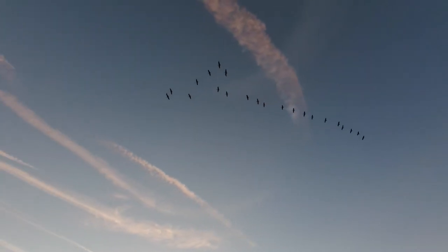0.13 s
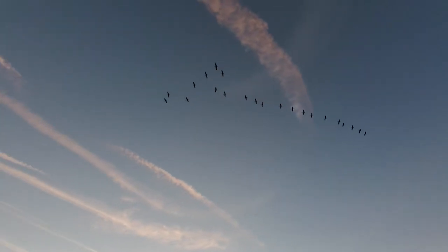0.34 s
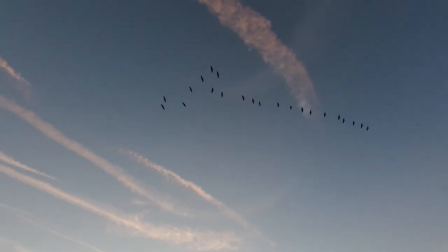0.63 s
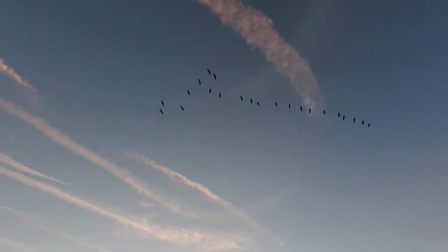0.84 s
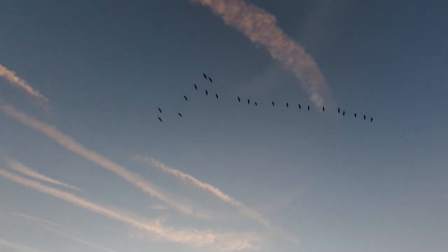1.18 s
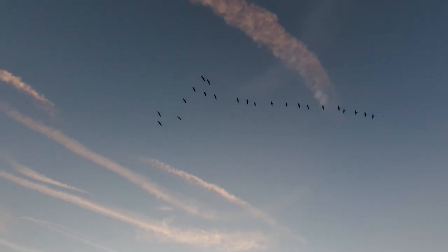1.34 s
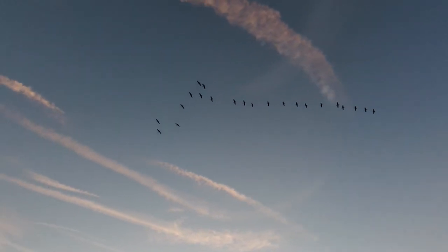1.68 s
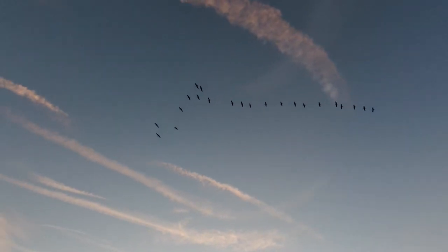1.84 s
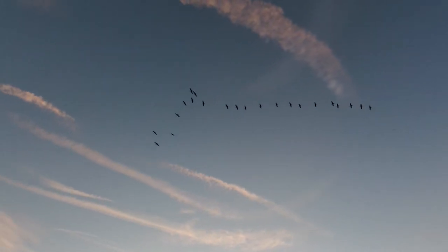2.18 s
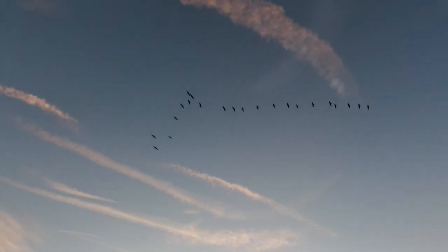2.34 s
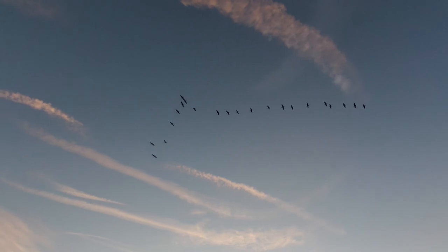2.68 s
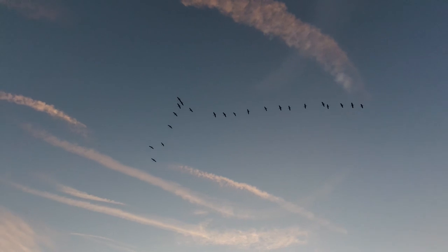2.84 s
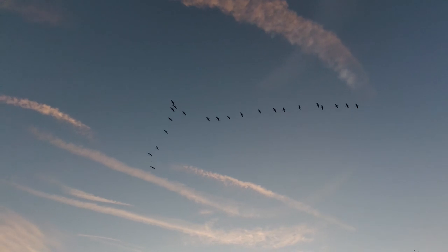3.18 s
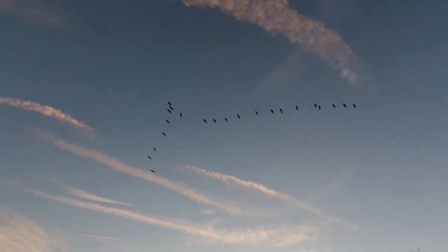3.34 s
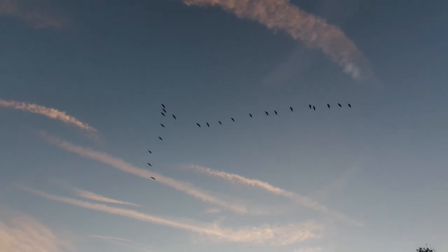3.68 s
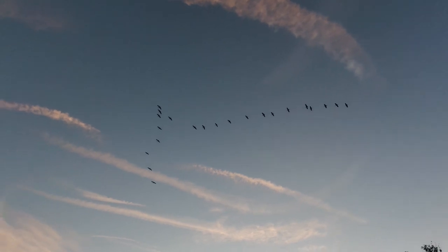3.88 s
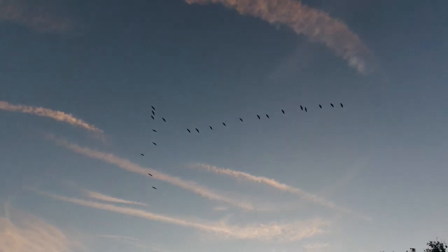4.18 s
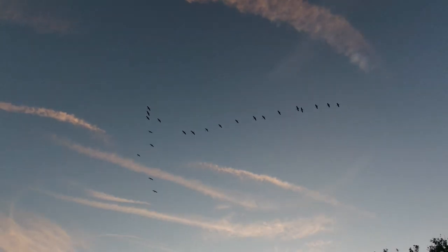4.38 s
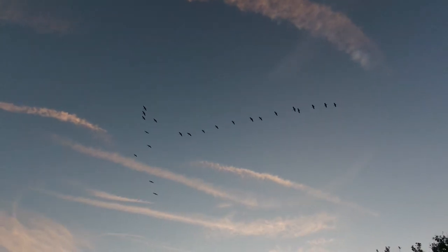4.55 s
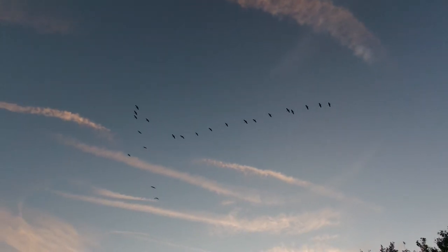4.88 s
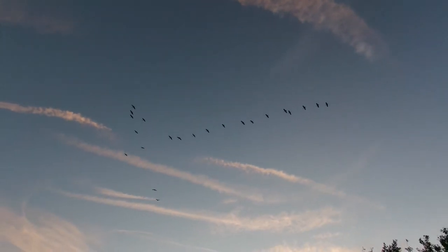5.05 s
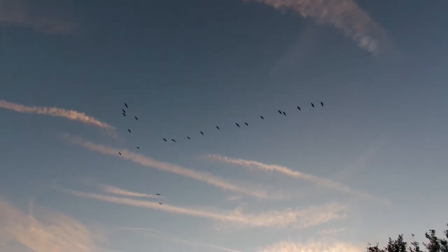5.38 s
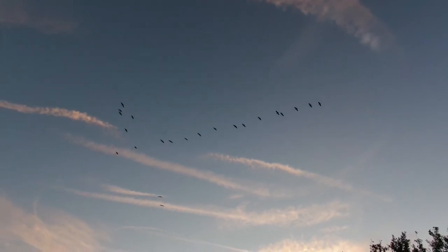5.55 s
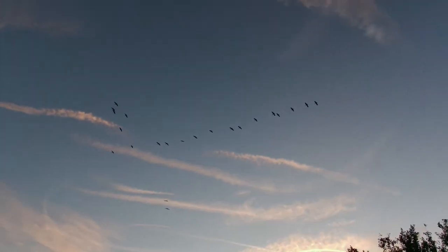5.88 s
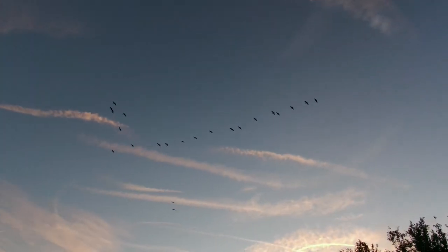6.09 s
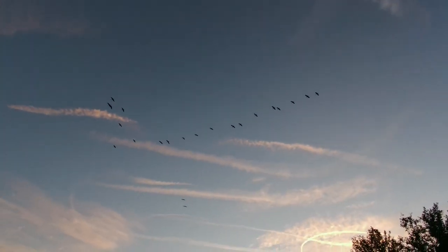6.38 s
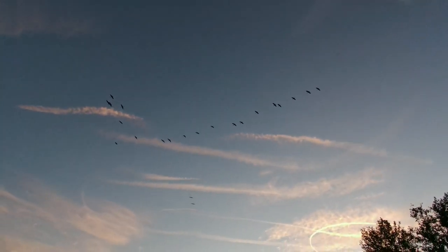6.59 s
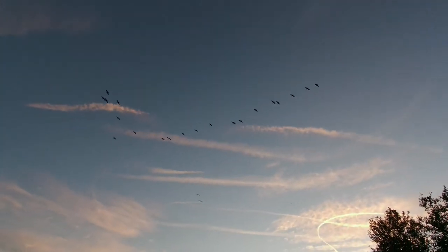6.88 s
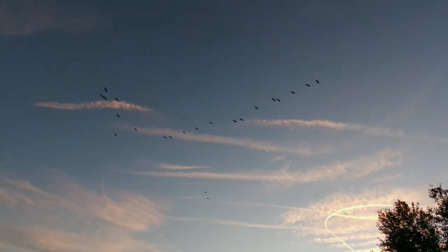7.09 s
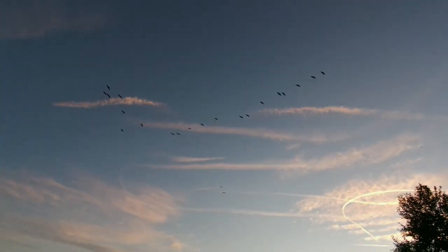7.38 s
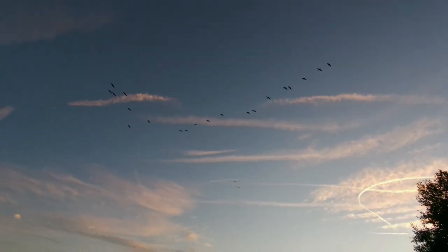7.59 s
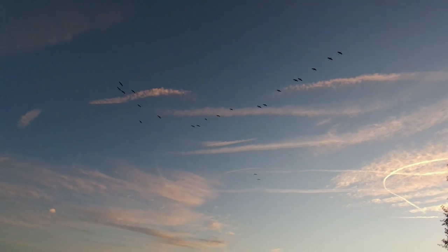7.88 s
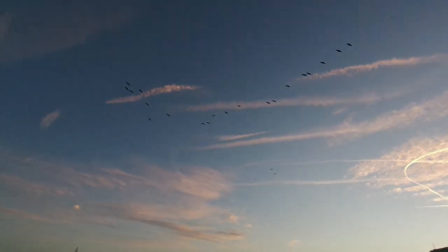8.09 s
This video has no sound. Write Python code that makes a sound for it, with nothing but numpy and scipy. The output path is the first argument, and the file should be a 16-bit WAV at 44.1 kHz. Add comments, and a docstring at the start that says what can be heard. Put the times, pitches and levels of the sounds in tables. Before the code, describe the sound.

A flock of cranes passes overhead, honking and rolling in overlapping bugles above a distant chorus, with faint camera motor whirs and soft air hiss.

```python
"""A flock of cranes calls: near birds honk and roll over a chorus of far ones, and young birds peep.
Calls are sums of a fundamental and its overtones; the overtones pass through a windpipe colour, then all birds echo.
A camera adds a gliding motor whine, low groans, patches of raspy treble and faint steady tones.
Coloured noise stands for far traffic, air and microphone hiss."""
import sys
import numpy as np
from scipy import signal
from scipy.fft import rfft, irfft
from scipy.io import wavfile
from scipy.ndimage import uniform_filter1d

SR = 44100
rng = np.random.default_rng(int(sys.argv[2]) if len(sys.argv) > 2 else 0)


def master(y):
    """Save y as 16-bit WAV."""
    cut = np.clip(np.atleast_2d(y).T, -1, 1)
    pcm = np.round(cut * 32767)  # scale
    wavfile.write(sys.argv[1], SR, pcm.astype(np.int16))


def volts_from_db(level):
    """Convert decibel levels to linear amplitude ratios."""
    exponent = np.asarray(level, float) / 20
    return 10 ** exponent


N = 362943
T = np.arange(N) / SR
HOARSE_ABOVE_HZ = 1050   # higher near voices are hoarse and arch less
HONK_TILT_DB, EDGE_TILT_DB = -2, -3.5   # dB per overtone: throughout; added at the ends, where effort is low
WHINE_TOP_HZ = 15800   # the whine is silent from here up


def coloured(x, points):
    """Filter by a (frequency [Hz], level [dB]) spectrum."""
    hz = np.maximum(np.fft.rfftfreq(N, 1 / SR), 1)
    point_hz, point_db = np.transpose(points)
    gain = volts_from_db(np.interp(np.log(hz), np.log(point_hz), point_db))
    return irfft(rfft(x) * gain, N)


def rms_one(x):
    """Scale to unit power."""
    return x / np.sqrt(np.mean(x ** 2) + 1e-20)


def drift(rate, count=N):
    """Smooth chance of spread about 1: random knots, rate of them per second, joined by straight lines."""
    knots = rng.standard_normal(int(count * 400 / SR) + 2)
    return 1.22 * np.interp(np.arange(count) * rate / SR, np.arange(len(knots)), knots)


def played(rows, fade_s):
    """Slice, columns over time and a faded window for one note."""
    s, *columns = np.transpose(rows)
    span = slice(int(s[0] * SR), min(int(s[-1] * SR), N))
    t = T[span]
    window = np.clip(np.minimum(t - s[0], s[-1] - t) / fade_s, 0, 1)
    return span, [np.interp(t, s, column) for column in columns], window


def voice(hz, tilt_db=0, count=7, flicker_db=0):
    """Fundamental (rms 1) and the sum of the overtones of a membrane swinging at hz; each overtone may flicker."""
    phase = 2 * np.pi * (np.cumsum(hz) / SR + rng.random())
    overtones = 0
    for k in range(2, count + 1):
        flicker = flicker_db * drift(22.8, count=len(hz)) if flicker_db else 0
        overtones = overtones + volts_from_db(tilt_db * (k - 2.5) + flicker) * np.cos(k * phase)
    return np.sqrt(2) * np.cos(phase), np.sqrt(2) * overtones


def glides(notes, waver):
    """Single gliding tones without overtones."""
    out = np.zeros(N)
    for rows in notes:
        span, (hz, level_db), window = played(rows, fade_s=0.0056)
        hz = hz * (1 + waver * drift(140.0, count=len(hz)))
        out[span] += window * volts_from_db(level_db) * voice(hz, count=1)[0]
    return out


def toot(start, length, hz, high_db, low_db):
    """Rows (s, Hz, fundamental dB, overtones dB, tilt dB) of a held note that sags ever faster."""
    sag_per_s2, edge_db = 3.51, 1.5   # share of pitch lost per s squared; level lost at the ends
    away = np.linspace(-1, 1, num=7)
    s = length * (away + 1) / 2
    level_db = high_db - edge_db * away ** 2
    pitch = hz * (1 - sag_per_s2 * s ** 2)
    tilt = HONK_TILT_DB + EDGE_TILT_DB * away ** 2
    return np.transpose([start + s, pitch, level_db + low_db, level_db, tilt])


def arch(start, length, top_hz, high_db, low_db=0):
    """Rows like those of a toot, for a call that climbs to its top, falls and droops."""
    top, rise, fall, power = 0.45, 0.06, 0.085, 3.0   # place of top; pitch lost at start, end (shares); steepness
    high_arch = 0.505   # high voices arch only this share as far
    swell_db, edge_db = 2, 10   # growth from start to top and again to the end; loss at both ends
    # The fundamental droops on (share of the fall) while the overtones close: dB lost per whole fall.
    droop, droop_shut_db, droop_loss_db = 0.35, 63, 24
    near_db, tilt_per_db = -48, 0.12   # nearer, louder calls are brighter
    middle_hz, tilt_db_per_khz = 900, -5   # higher voices lose more per overtone
    away = np.linspace(-1, 1 + droop, num=16)   # -1 start, 0 top, 1 end, then the droop
    body, after = np.minimum(away, 1), np.maximum(away - 1, 0)
    s = start + length * (top + away * np.where(away < 0, top, 1 - top))
    bend = np.where(away < 0, rise, fall) * np.abs(away) ** power
    hz = top_hz * (1 - bend * (high_arch if top_hz > HOARSE_ABOVE_HZ else 1))
    level_db = high_db + swell_db * body - edge_db * body ** 4.0 - droop_loss_db * after
    tilt = tilt_per_db * (high_db - near_db) + tilt_db_per_khz * (top_hz - middle_hz) / 1000
    tilt = tilt + HONK_TILT_DB + EDGE_TILT_DB * away ** 2
    return np.transpose([s, hz, level_db + low_db, level_db - droop_shut_db * after, tilt])


def climb(start, length, hz, high_db, low_db):
    """Rows like those of a toot, for a note that scoops up to a late top, growing, and tips over."""
    top, lost_per_s2 = 0.79, 7.0   # place of the top; share of pitch lost per s squared away from it
    s, _, low, high, tilt = toot(start, length, hz, high_db, low_db).T
    pitch = hz * (1 - lost_per_s2 * (s - start - top * length) ** 2)
    grown_db = 3 * (2 * (s - start) / length - 1)   # from -3 dB to +3 dB
    return np.transpose([s, pitch, low + grown_db, high + grown_db / 2, tilt])


def honks(waver=0.0026, flutter_db=2.5, hoarse=0.0055):
    """Near birds hold tones with a slight waver of pitch and level; high voices get a faster pitch jitter."""
    # Three kinds of clear call, levels ahead of their swells and the windpipe colour:
    # (start [s], length [s], pitch [Hz], overtones [dB], fundamental against overtones [dB])
    arched = [(.05, 0.29, 853, -61, 6), (0.381, 0.21, 1120, -72.5, 10), (.62, 0.24, 848, -74.5, 23.5),
              (0.765, 0.22, 1247, -62.5, 7.5), (1.739, 0.25, 1113, -61, 1.5), (1.78, 0.25, 1167, -67.5, -4),
              (1.99, 0.25, 855, -53.5, 6), (2.36, 0.23, 1178, -75.5, 16), (3.39, 0.26, 846.6, -56.5, 16),
              (3.599, 0.19, 1242, -58.5, 6.5), (4.082, 0.24, 1121, -60, 5), (4.14, 0.18, 1182, -64, 7),
              (4.136, 0.21, 704, -56.5, -20), (4.61, 0.29, 848.4, -54, 13.5),
              (4.719, 0.24, 1229, -61.5, 7.5), (4.977, 0.2, 1094, -55.5, 13),
              (5.148, 0.24, 1095, -55.5, 5.5), (5.27, 0.15, 1057, -61, 7), (5.76, 0.32, 1223, -67, 5),
              (6.04, .28, 1102, -52.5, 1), (6.5, 0.28, 1200, -79, 16.5), (7.105, 0.19, 690, -57.5, -9),
              (7.17, 0.24, 1275, -66, -4), (7.415, 0.26, 852, -55.5, 16.5)]   # these arch up to the given pitch, then droop on past their length
    held = [(0.0, 0.092, 786, -59.5, 14.5), (1.177, 0.087, 954, -53, 8.5), (1.59, 0.068, 812, -70.5, 14),
            (2.68, 0.23, 863, -67.5, 6.5), (2.95, 0.09, 807, -61, 9), (2.966, 0.082, 927, -57, -6),
            (3.14, 0.08, 822, -66, -9), (3.63, 0.17, 850, -70.5, 24), (4.102, 0.097, 932, -56, 3),
            (5.238, 0.12, 787, -61.5, 12), (5.593, 0.051, 764, -59, 4), (5.657, 0.063, 860, -57.5, -5),
            (5.7, 0.033, 853, -73, -3), (5.895, 0.068, 940, -58, 13), (6.815, 0.082, 934, -58, 7.5),
            (6.989, 0.06, 1110, -58, 7.5), (7.077, 0.16, 1094, -57, 7), (7.68, 0.087, 994, -68, 10),
            (8.103, 0.46, 925, -60, 10.5), (8.103, 0.3, 797, -65.5, 20)]   # short, sagging from the given pitch
    climbing = [(4.54, 0.12, 810, -56.5, 11), (7.02, 0.15, 1162, -50.5, 12), (1.05, .16, 1140, -60.5, 15)]   # these rise to the given pitch
    # Brightness of the near calls over time: (time [s], tilt [dB per overtone])
    brightness = [(0, 3.5), (.15, -7.5), (.8, 0), (1.1, 5), (1.2, -6), (1.85, 1), (2.1, 0.8), (2.95, -6.5),
                  (3.15, -7), (3.5, 0.5), (3.7, 2), (4.2, 0.5), (4.7, 0.65), (4.95, 3), (5.25, 4),
                  (5.6, -4.5), (5.68, 2), (6.15, -3.5), (7.1, 0.8), (7.2, -3), (7.4, 1), (7.55, 0.3),
                  (8.2, -5)]
    top_hz = 4800   # high voices carry no overtone above this
    half_above_hz, half_db = 1200, -14   # alternate strong and weak cycles: a line at half pitch
    notes = [arch(*row) for row in arched]
    notes += [toot(*row) for row in held]
    notes += [climb(*row) for row in climbing]
    out = np.zeros((2, N))
    for rows in notes:
        span, (hz, low_db, high_db, tilt_db), window = played(rows, fade_s=.02)
        count = len(hz)
        jitter = hoarse * (hz.max() > HOARSE_ABOVE_HZ) * drift(198.3, count=count)
        hz = hz * (1 + waver * drift(62.7, count=count) + jitter)
        tilt_db = tilt_db + np.interp(T[span], *np.transpose(brightness))
        harmonics = int(top_hz / hz.max()) if hz.max() > HOARSE_ABOVE_HZ else 6
        low, high = voice(hz, tilt_db, count=harmonics, flicker_db=2.5)
        if hz.max() > half_above_hz:
            low += volts_from_db(half_db) * voice(hz / 2, count=1)[0]
        gain = window * volts_from_db(flutter_db * drift(52.8, count=count))
        out[:, span] += gain * [low * volts_from_db(low_db), high * volts_from_db(high_db)]
    return out


def stepped(part, sharp=12):
    """A beat of a roll holds its pitch, then drops to one lower by a share of .065."""
    return 1 - .065 / 2 * np.tanh(sharp * (part - .45))


def surging(pitches):
    """Power of fundamentals and overtones, murmur plus surges, and each bird's share: it joins groups near its pitch."""
    # The far chorus murmurs throughout: (time [s], fundamentals [dB])
    murmur_levels = [(0, -54.5), (1.3, -53), (1.7, -53.5), (2.7, -54), (3.4, -53), (4.0, -58), (4.6, -53.5),
                     (5.5, -49), (6.0, -53.5), (6.9, -47.5), (7.4, -45), (7.85, -53.5), (8.23, -48.5)]
    # Groups of birds surge out of it:
    # (start [s], length [s], fundamentals [dB], pitch [Hz], overtones against fundamentals [dB])
    groups = [(-.05, 0.097, -47.5, 930, -8), (.3, .12, -55, 780, -17), (.45, 0.14, -56, 1050, -18),
              (0.748, 0.066, -45, 854, -7.5), (0.988, 0.058, -50.5, 905, -1), (1.1, 0.11, -39.5, 1050, -7),
              (1.11, .08, -41, 840, -9), (1.502, 0.064, -50, 890, -7.5), (1.814, 0.043, -47.5, 1014, -4),
              (2.088, 0.2, -47, 864, -13.5), (2.462, 0.14, -55.5, 988, -34), (2.37, 0.089, -55, 795, -12),
              (2.55, 0.085, -55.5, 830, -20), (2.81, 0.11, -42.5, 844, -12), (2.926, 0.05, -45.5, 925, -3),
              (3.54, 0.098, -42.5, 974, -18), (3.742, 0.15, -51, 930, -10), (3.999, 0.15, -45.5, 850, -8),
              (4.246, 0.076, -45.5, 1043, -10.5), (4.384, 0.23, -45.5, 727, -14),
              (4.706, 0.19, -41, 827, -11), (4.841, 0.14, -38.5, 876, -16.5),
              (5.11, 0.086, -39.5, 930, -8.5), (5.235, 0.14, -39.5, 757, -8), (5.458, 0.1, -47.5, 786, -24),
              (5.512, 0.12, -53.5, 1020, -15), (5.62, 0.13, -45, 816, -15.5), (5.792, 0.15, -50, 1183, -25),
              (5.865, 0.12, -45.5, 993, -19), (5.972, 0.16, -48, 784, -13), (6.3, 0.062, -46.5, 783, -18),
              (6.542, 0.23, -51, 1070, -16), (6.125, 0.13, -42.5, 870, -11.5),
              (6.402, 0.1, -41.5, 860, -19), (6.514, 0.18, -43.5, 840, -22),
              (7.11, 0.17, -40.5, 850, -13.5), (7.172, 0.03, -42.5, 900, -5.5),
              (7.239, 0.057, -45.5, 995, -5.5), (7.504, 0.15, -45, 954, -7.5),
              (7.984, 0.23, -50, 940, -5.5)]
    rise_db_per_s, fall_db_per_s = 186, 168
    murmur_hz, murmur_overtones_db = 930, -18.5   # centre pitch; overtones against fundamentals
    murmur_spread_hz, surge_spread_hz = 236, 98   # how far the pitches of a group lie apart
    start, length, low_db, hz, rel_db = np.transpose(groups)[:, :, None]
    lost_db = np.maximum(rise_db_per_s * (start - T), fall_db_per_s * (T - start - length))
    surges = volts_from_db(2 * (low_db - np.maximum(lost_db, 0)))   # doubled dB turn into power
    murmur = volts_from_db(2 * np.interp(T, *np.transpose(murmur_levels)))
    low = murmur + surges.sum(axis=0)
    high = murmur * volts_from_db(2 * murmur_overtones_db) + volts_from_db(2 * rel_db[:, 0]) @ surges
    near = np.exp(-2 * ((pitches - hz) / surge_spread_hz) ** 2) / surge_spread_hz
    wide = np.exp(-2 * ((pitches - murmur_hz) / murmur_spread_hz) ** 2) / murmur_spread_hz
    return low, high, 100 * (near.T @ surges + np.outer(wide, murmur)) / low


def chorus(count=17, wander=.025):
    """Many hoarse far birds, each at its own pitch and roll rate, swell and fade; their sum is evened out."""
    roll_depth, swell_db = .75, 8.5
    jitter, level_rasp, effort_glide = .0045, .2, .015   # shares; pitch rises with effort
    pitches = np.geomspace(690, 1170, count)   # Hz
    low_power, high_power, shares = surging(pitches)
    out, power = np.zeros((2, N)), 1e-9
    for hz, share in zip(pitches, shares):
        rolls_per_s = rng.uniform(19, 27) * (1 + .15 * drift(4))
        roll = (np.cumsum(rolls_per_s) / SR + rng.random()) % 1   # place within the beat
        effort = drift(7)
        bend = effort_glide * effort + wander * drift(5) + jitter * drift(220)
        pitch = hz * stepped(roll, sharp=47.0) * (1 + bend)
        swell = volts_from_db(swell_db * effort) * np.sqrt(share)
        gate = 1 - roll_depth * (roll + np.exp(-roll / 0.019))   # opens fast, closes slowly
        level = swell * gate * (1 + level_rasp * drift(300))
        out += level * np.array(voice(pitch, tilt_db=-2.0, count=5))
        power = power + swell ** 2
    low, high = out / np.sqrt(power)
    return np.array([rms_one(low) * np.sqrt(low_power), rms_one(high) * np.sqrt(high_power)])


def background():
    """Far traffic, air and microphone hiss: steady noise shaped by a spectrum."""
    # Only the shape counts: (frequency [Hz], relative level [dB per Hz])
    floor_shape = [(25, -15), (55, -3), (105, 2.5), (300, -8), (560, -9.5), (1400, -14), (2800, -23.5),
                   (6000, -27.5), (7600, -26.5), (11500, -32.5), (15500, -30.5)]
    return volts_from_db(-60.5) * rms_one(coloured(rng.standard_normal(N), floor_shape))


def steady_tones():
    """Faint sine tones of the camera that never change."""
    # (frequency [Hz], level [dB])
    tone_lines = [(6002, -82.5), (9001, -99), (11999, -112.5)]
    return sum(np.sqrt(2) * volts_from_db(db) * np.sin(2 * np.pi * hz * T) for hz, db in tone_lines)


def rolled():
    """Rows (s, Hz, overtones dB) of every beat: a roll swells towards its middle."""
    # Rolled calls of near birds:
    # (first beat [s], beats [count], time between beats [s], pitch [Hz], overtones [dB])
    roll_calls = [(.092, 1, .045, 793, -52), (.177, 3, 0.043, 930, -57), (.704, 3, 0.053, 756, -56.5),
                  (.85, 1, .045, 960, -70), (.998, 1, .045, 905, -56.5), (1.036, 4, 0.046, 1048, -51),
                  (1.234, 4, .049, 1034, -53), (1.409, 1, .045, 882, -59), (1.451, 2, .043, 903, -54.5),
                  (1.536, 3, 0.042, 796, -57.5), (1.988, 1, .045, 900, -57.5), (2.27, 6, .045, 1090, -65),
                  (2.712, 1, .045, 901, -65), (2.948, 1, .045, 900, -57), (5.686, 1, .045, 903, -56.5),
                  (2.769, 4, 0.045, 969, -52.5), (3.195, 4, .045, 828, -64.5),
                  (3.896, 1, .045, 1010, -55.5), (3.942, 2, .042, 997, -48.5), (4.03, 3, .044, 1006, -51),
                  (4.542, 1, .045, 900, -58.5), (4.654, 2, .043, 1022, -60), (4.77, 5, .045, 985, -54.5),
                  (5.26, 3, .05, 1052, -57.5), (5.591, 1, 0.06, 997, -61), (5.641, 1, .045, 826, -56),
                  (5.799, 4, 0.042, 989, -57), (6.058, 8, .0415, 935, -61), (6.4, 3, .045, 875, -63.5),
                  (6.687, 4, 0.04, 1104, -59), (6.837, 1, .045, 987, -55), (7.342, 1, .045, 900, -66),
                  (7.414, 4, 0.047, 1050, -54), (7.948, 4, 0.051, 1043, -58.5), (8.182, 1, .045, 950, -52)]
    edge_db, scoop, spread = 2, 0.026, 0.014   # softer towards both ends; lower first beat, pitch spread (shares)
    for first, count, gap, hz, high_db in roll_calls:
        count = int(round(count))
        for k in range(count):
            away = (2 * k + 1) / count - 1
            pitch = 1 - scoop * (k == 0 < count - 1) + spread * rng.standard_normal()
            yield first + k * gap, hz * pitch, high_db - edge_db * away ** 2


def beats(second=0.77, breath_db=-10):
    """Each beat is a short, hoarse stroke with a puff of air and a softer, lower one close behind; it snaps open."""
    beat_s, lead_s, attack = .028, .012, .11   # length, start ahead of the listed time; attack as share of the beat
    jitter, rasp_db, fundamental_db = .017, 2.2, 11.5   # pitch share; level flutter; against overtones
    snap_db, snap_s, snap_hz = -5, .004, (2500, 8000)   # level before its filter, decay, band
    count = 1500   # samples
    part = np.arange(count) / SR / beat_s
    opening = np.minimum(part / attack, 1)
    out = np.zeros((3, N))
    for s, hz, high_db in rolled():
        pitch = hz * stepped(part) * (1 + jitter * drift(260, count=count))
        low, high = voice(pitch, tilt_db=-4.0)
        first_stroke = opening * np.exp(-((part - .22) / .2) ** 2)
        second_stroke = second * np.exp(-((part - .68) / 0.17) ** 2)
        shape = (first_stroke + second_stroke) * volts_from_db(rasp_db * drift(350, count=count))
        air = rng.standard_normal(count + 1)
        breathy = high + volts_from_db(breath_db) * np.diff(air)   # differencing makes the air bright
        snap = volts_from_db(snap_db) * air[1:] * opening * np.exp(-part * beat_s / snap_s)
        start = int((s - lead_s) * SR)
        layers = np.array([shape * low * volts_from_db(fundamental_db), shape * breathy, snap])
        out[:, start:start + count] += volts_from_db(high_db) * layers
    band = signal.butter(2, snap_hz, "band", fs=SR, output="sos")
    return out[:2], signal.sosfilt(band, out[2] + 1e-18)


def rasps():
    """Noise in the top treble comes in patches with a flickering level."""
    # (start [s], end [s], level before flicker [dB])
    patches = [(0.24, 0.71, -76), (1.577, 1.65, -72), (1.765, 1.806, -76), (1.897, 1.997, -75.5),
               (2.11, 2.32, -74.5), (2.706, 2.846, -73.5), (3.237, 3.43, -81), (3.466, 3.56, -75),
               (3.844, 3.987, -78), (4.253, 4.496, -76.5), (4.703, 4.85, -75), (4.925, 5.03, -80),
               (5.246, 5.323, -77.5), (6.31, 6.522, -73.5), (7.996, 8.058, -90)]
    gate = sum(volts_from_db(db) * np.clip(np.minimum(T - a, b - T) / .01, 0, 1) for a, b, db in patches)
    band = signal.butter(4, (12500, 15500), "band", fs=SR, output="sos")
    noise = rms_one(signal.sosfilt(band, rng.standard_normal(N)))
    return gate * volts_from_db(3.3 * drift(60)) * noise


def peeps():
    """Young birds peep in single tones that arch like the honks."""
    # (start [s], length before the droop [s], top pitch [Hz], level at the top [dB])
    peep_calls = [(0.608, 0.18, 3940, -65), (0.828, 0.047, 3850, -57), (1.558, 0.027, 3730, -71),
                  (1.711, 0.042, 3550, -73), (7.94, 0.22, 4295, -66.5)]
    return glides([arch(*row)[:, :3] for row in peep_calls], waver=0.0194)


def groans():
    """Low tones of the camera motor slide down with an uneven pitch."""
    # (start [s], length [s], from [Hz], to [Hz], level [dB])
    slides = [(0.818, 0.064, 440, 265, -56), (1.116, 0.138, 306, 192, -57.5)]
    notes = [[(s, a_hz, db), (s + length, b_hz, db)] for s, length, a_hz, b_hz, db in slides]
    return glides(notes, waver=0.11)


def whine(waver=0.026, flicker_db=2.0):
    """The motor pitch follows whichever dip is deepest; it sounds with its octave."""
    # Dips of the pitch into hearing: (lowest at [s], lowest pitch [Hz], time from there back to the top [s])
    dips = [(.826, 14600, 0.028), (0.924, 6740, 0.07), (.955, 7350, 0.041), (1.012, 13460, .04),
            (1.053, 8880, .048), (1.124, 8580, 0.063), (1.16, 10100, 0.044), (1.212, 11300, 0.038),
            (1.254, 13400, .015), (1.43, 15400, .05), (1.478, 14100, 0.037), (5.155, 14400, 0.033),
            (5.628, 12000, 0.052), (6.741, 12900, .055), (6.835, 13900, 0.05), (7.18, 11300, 0.047),
            (7.248, 10300, 0.078), (7.82, 11200, 0.039), (7.895, 10430, 0.09), (7.96, 12100, .025),
            (8.02, 15000, 0.052), (8.17, 12500, 0.064), (8.24, 7800, .045)]
    # The camera body favours some whine pitches: (frequency [Hz], level [dB])
    body_colour = [(6800, -63), (8600, -62), (9600, -76.5), (10600, -68), (11500, -85), (13000, -65.5),
                   (15200, -70), (15700, -104)]
    dip_power, octave_db = 1.8, -9
    hz = np.min([low_hz + (WHINE_TOP_HZ - low_hz) * np.abs((T - s) / back_s) ** dip_power
                 for s, low_hz, back_s in dips], axis=0)
    heard = uniform_filter1d((hz < WHINE_TOP_HZ) * 1., size=200)
    hz = uniform_filter1d(np.minimum(hz, WHINE_TOP_HZ), size=700) * (1 + waver * drift(250))
    phase = 2 * np.pi * np.cumsum(hz) / SR
    octave = volts_from_db(octave_db) * (2 * hz < WHINE_TOP_HZ) * np.cos(2 * phase)
    tone = np.sqrt(2) * (np.cos(phase) + octave)
    return coloured(heard * volts_from_db(flicker_db * drift(120)) * tone, body_colour)


def camera():
    """Whine, groans, rasp and steady tones arise in the camera and get no echo."""
    return whine() + groans() + rasps() + steady_tones()


def echoes(birds):
    """Ground and trees send back later, weaker copies of the birds."""
    # (delay [s], level [dB])
    reflections = [(.023, -17), (.052, -16), (.083, -17), (.14, -19)]
    return sum(volts_from_db(db) * np.pad(birds, (int(s * SR), 0))[:N] for s, db in reflections)


def scene():
    """Birds through windpipe and echoes, over camera noise and the background."""
    # Windpipe and microphone colour of the overtones: (frequency [Hz], level [dB])
    windpipe = [(1200, -1.5), (1700, -1.5), (2200, -4), (2500, -12.5), (2800, -17.5), (3250, -3.5),
                (3520, -3), (3850, -10), (4350, -10.5), (4700, -11.5), (5150, -16.5), (5550, -13),
                (7500, -23.5)]
    strokes, snaps = beats()
    low, high = honks() + strokes + chorus()
    birds = low + coloured(high, windpipe) + snaps + peeps()
    return (birds + echoes(birds) + camera() + background())[None]


def low_pass(x):
    """Removes everything above the highest recorded frequency."""
    return signal.sosfilt(signal.butter(12, 15710, fs=SR, output="sos"), x)


def record(dry):
    """Turn the finished mix into the output sound."""
    return low_pass(dry)


dry = scene()
out = record(dry)
master(out)
```